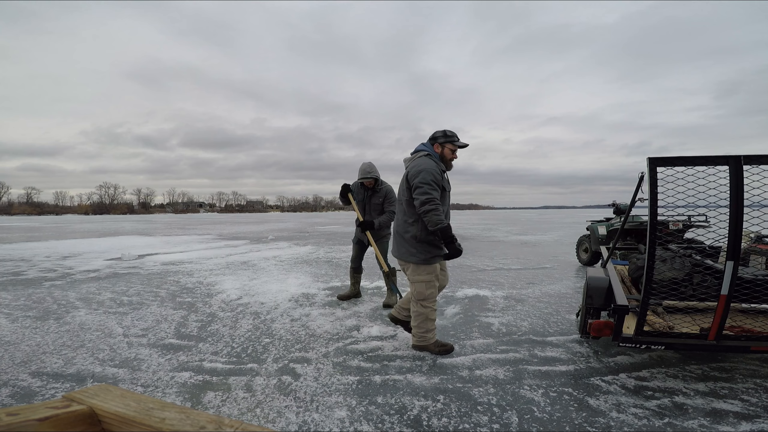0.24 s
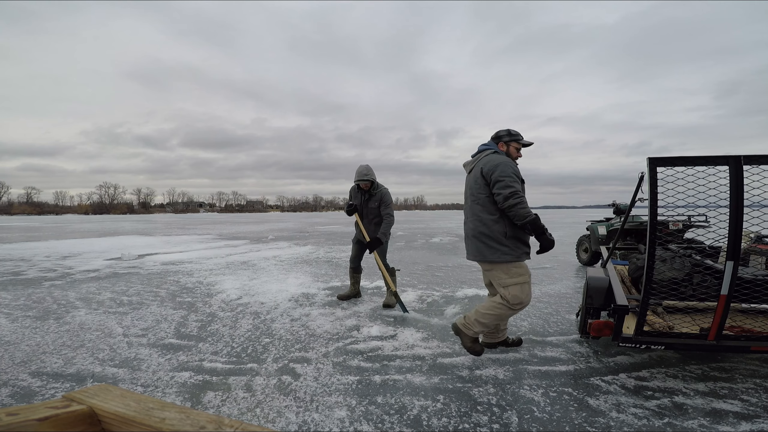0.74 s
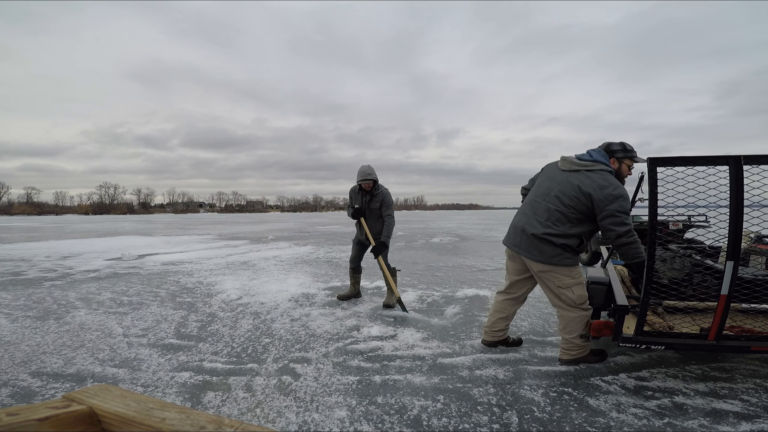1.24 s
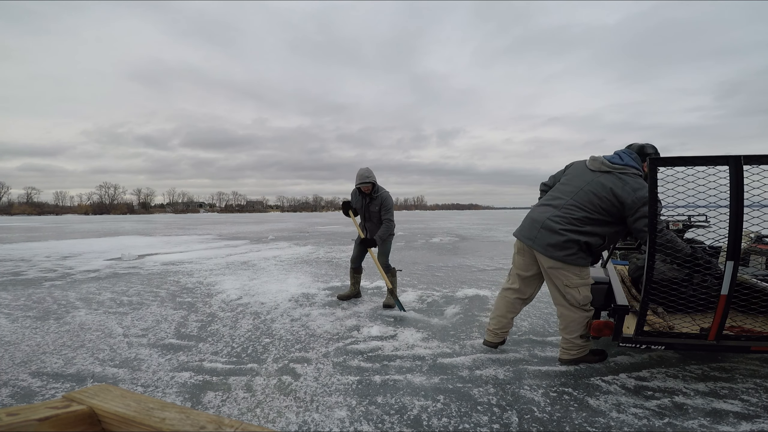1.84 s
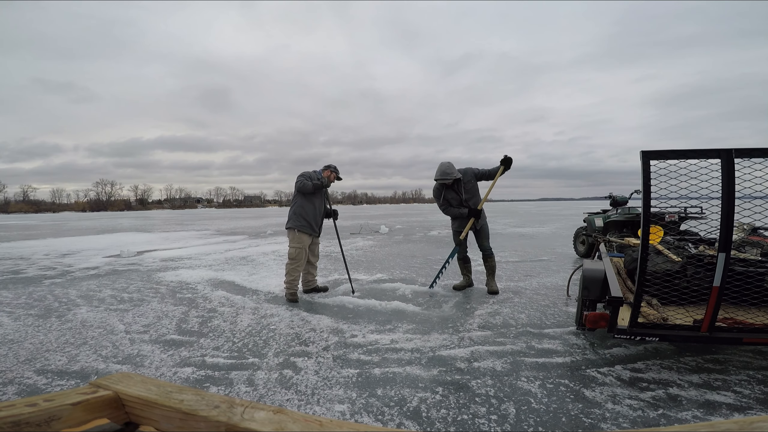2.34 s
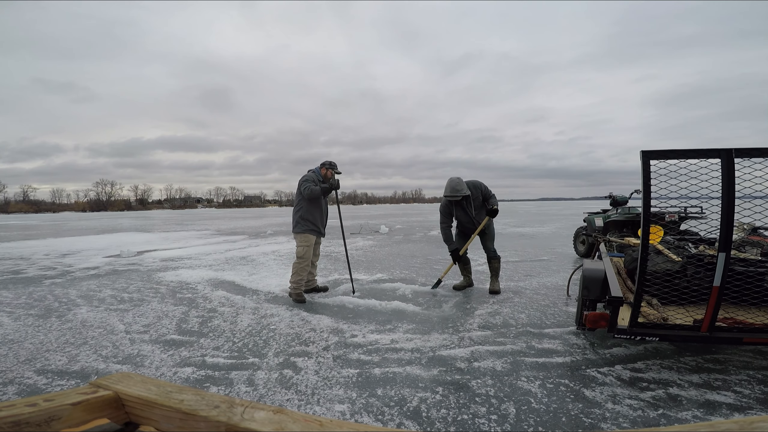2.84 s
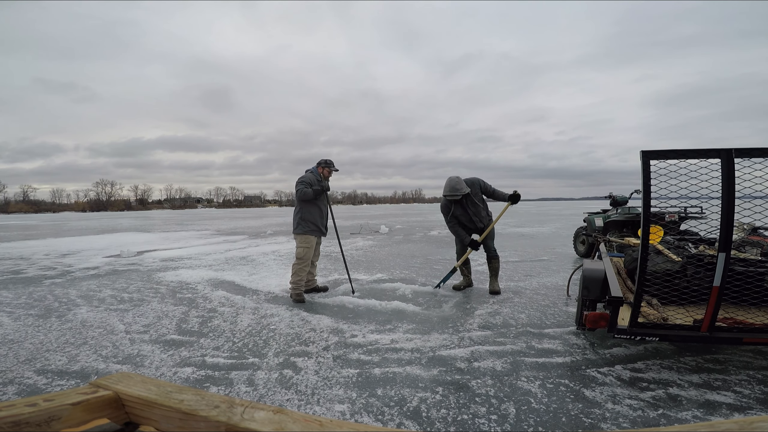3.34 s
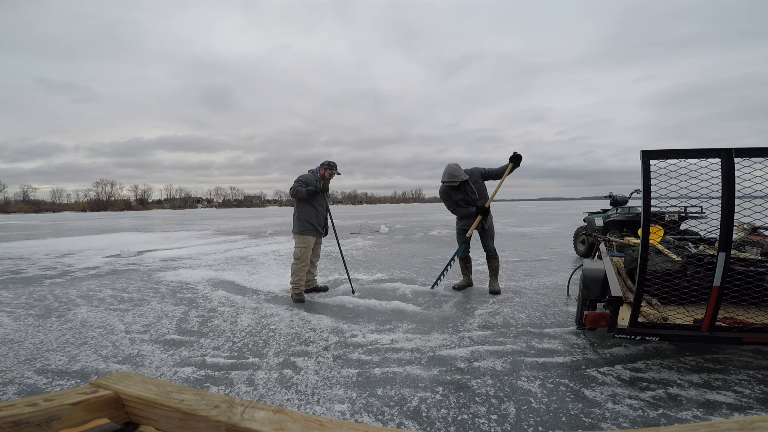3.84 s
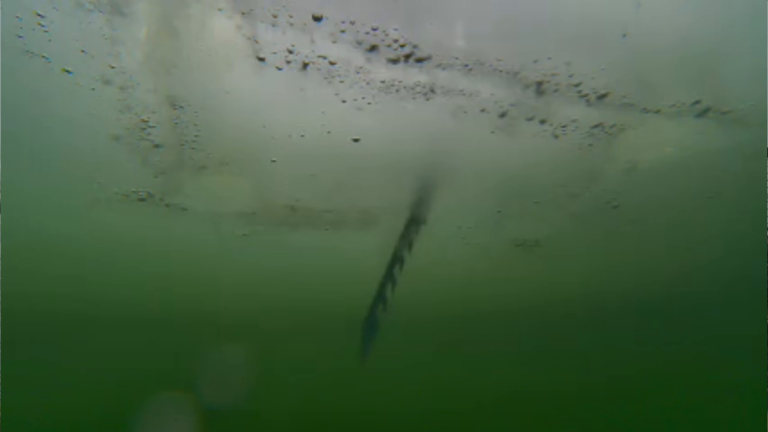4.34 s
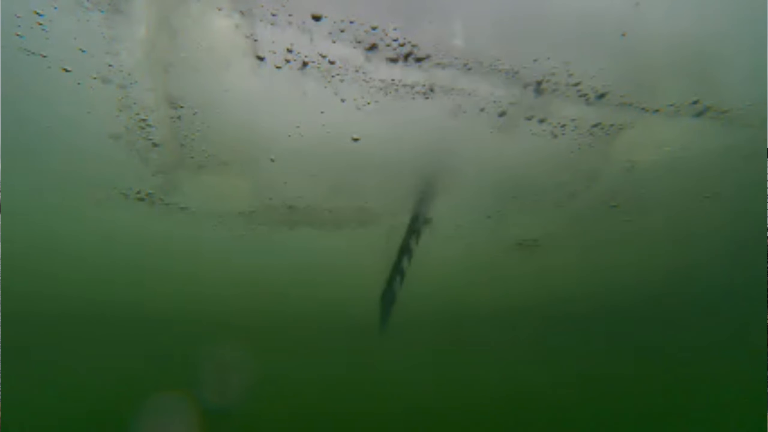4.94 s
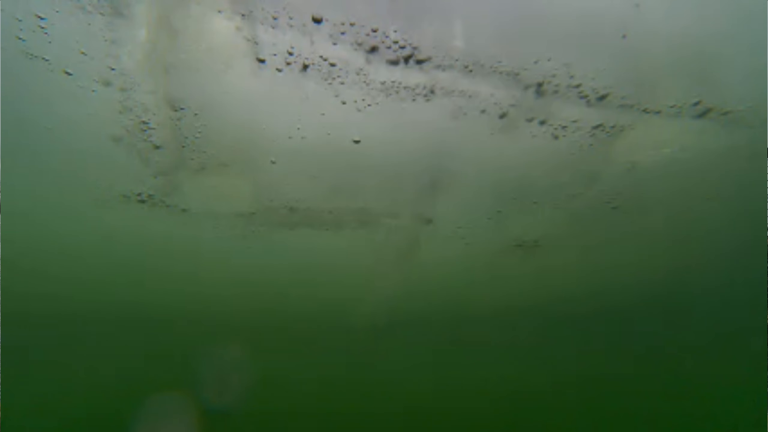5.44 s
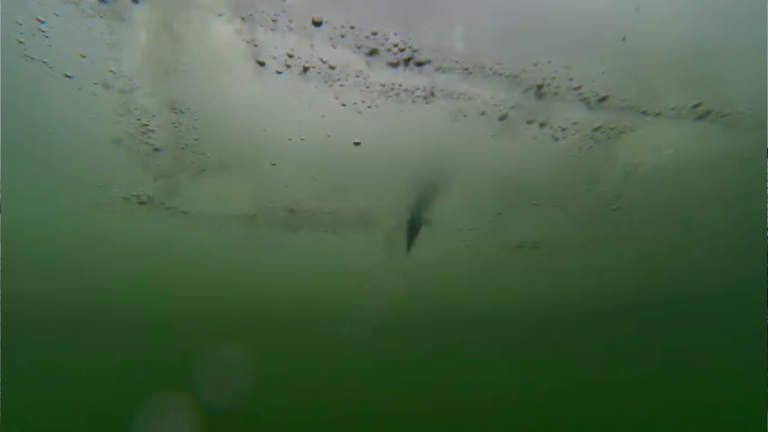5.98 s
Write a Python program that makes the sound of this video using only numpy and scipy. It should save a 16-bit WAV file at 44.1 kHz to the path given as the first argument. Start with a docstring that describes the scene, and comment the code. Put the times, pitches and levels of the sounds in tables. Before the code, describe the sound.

On an open frozen lake, a long steel hand saw cuts ice: a loud, crunchy push, then a weaker rattling pull, roughly every 0.7 seconds. Cracks and brief squeaks break through. Faint boot thuds and a hard double gear knock on a trailer come early. After about two seconds a soft pop shifts the sawing to a duller, more distant sound. Wind rumbles directly on the microphone, with no reverberation.

```python
"""A loud rasping push, then a lighter rattling pull, about every 0.7 s: a long hand saw cuts lake ice.
The first strokes sound close, the later ones farther off and duller. Cracks, squeaks, boot thuds, gear
knocks on a trailer, soft pops, wind rumble and faint hiss join in.
The rasp is noise made of tiny ice chips, sent through the echoes and resonances of the steel blade.
Cracks and thuds are dying noise, knocks add ringing sines, and the wind is slow shaped noise."""
import sys
import numpy as np
from scipy import signal
from scipy.fft import rfft, irfft
from scipy.io import wavfile

SR = 44100
rng = np.random.default_rng(int(sys.argv[2]) if len(sys.argv) > 2 else 0)


def digitize_waveform(pressure):
    """Quantize a signal to 16-bit integers and store it at the path in sys.argv[1].

    Rows of a 2-D input are taken as channels; values are limited to [-1, 1].
    """
    field = np.atleast_2d(pressure).T
    bounded = np.clip(field, -1, 1)
    quanta = np.round(bounded * 32767).astype(np.int16)
    wavfile.write(sys.argv[1], SR, quanta)


N = 273840
TIME = np.arange(N) / SR  # seconds

# The saw is pushed down. Each row: start in seconds, speeding up in seconds, slowing down in seconds,
# relative level in dB, swell from the ends in dB, deep crunch in dB, hiss of fine chips in dB.
PUSH_STROKES = [(-0.161, 0.19, 0.099, -18, 18, 5.5, -7), (0.438, 0.18, 0.088, -16.5, 12.5, 1, -2.5),
                (1.08, 0.15, 0.083, -15.5, 18, 4, -0.5), (1.655, 0.2, .11, -18, 14, 3, -3),
                (2.434, 0.22, 0.18, -21, 32, -0.5, -9.5), (3.184, .206, 0.14, -21, 21, -0.5, -10),
                (3.906, 0.21, 0.23, -22.5, 33.5, 0.5, -9), (4.28, 0.13, 0.089, -25, 19, 3, -9),
                (4.87, 0.22, 0.17, -23, 27.5, 2, -9), (5.608, 0.23, .105, -22, 17, -0.5, -9.5)]
# The saw is pulled back up. Each row has the same columns as a push.
PULL_STROKES = [(0.111, 0.21, 0.13, -30, 11.3, 1.9, -3), (0.675, 0.17, 0.34, -26.5, 20.3, 4.6, -3),
                (1.299, 0.3, 0.07, -29, 6.3, 5.7, -1), (1.935, .133, 0.34, -30, 11, 6.5, -3),
                (2.765, 0.34, 0.11, -32, 11.5, 1.8, -6), (3.514, 0.2, 0.17, -36, 3.9, 2.8, -8.5),
                (4.445, 0.32, 0.095, -32.5, 18, 5.6, -9.5), (5.198, .202, 0.19, -33.5, 10, 4.4, -8),
                (5.917, 0.39, .25, -38.5, 2, 1.3, -9)]
# The teeth dig in suddenly and work free. Each row: start in seconds, dB over the stroke, length in seconds.
TEETH_DIGS = [(0.231, 9, 0.075), (0.364, 7, 0.045), (0.523, 2, .11), (0.906, 11.5, 0.039),
              (0.994, 7.5, 0.033), (1.205, 3, 0.063), (1.374, 3, 0.074), (1.793, 0.5, 0.043),
              (3.12, 0, 0.086), (4.106, 5, 0.074), (4.61, 6, 0.051), (4.957, 5, 0.091), (5.871, 3.5, 0.073)]
# Colour of the close rasp. Each row: frequency in Hz, relative level in dB per Hz.
CLOSE_COLOUR = [(94, -14), (160, -7), (357, -6), (524, -4), (599, -6.5), (659, 1), (783, -8), (879, 2.5),
                (1150, 3.5), (2990, -2), (4920, -1), (5410, -5), (6810, -7), (8090, -11.5), (15500, -50.5)]
# Colour of the rasp farther off. Each row: frequency in Hz, relative level in dB per Hz.
FAR_COLOUR = [(120, -48), (200, -10.5), (420, -11.5), (530, -5), (660, -3.5), (800, -6), (1100, 1.5),
              (1400, -0.5), (1540, -5), (1700, -3), (2420, -0.5), (2950, -5), (4400, -3.5), (6470, -11.5),
              (15500, -43)]
# Resonances of the steel blade. Each row: frequency in Hz, width in Hz, relative level in dB.
BLADE_MODES = [(955, 60, -2), (1125, 50, 4), (1235, 60, 4), (1375, 50, 1), (1690, 60, -2), (1920, 60, -2),
               (2290, 80, 0), (2435, 40, 3), (2580, 50, 3), (2790, 70, 0), (3340, 70, 0), (4050, 220, 0),
               (6710, 25, 7), (6850, 55, 7), (7372, 35, 3), (7950, 100, 7), (9150, 300, 1), (11100, 400, 1)]
# A tooth catches hard and breaks out a chip. Each row: start in seconds, relative peak in dB,
# pitch in Hz, time to fade by 60 dB in seconds.
TOOTH_CATCHES = [(0.109, -18, 1090, 0.055), (0.173, -21.5, 1040, 0.029), (0.236, -11, 2370, .06),
                 (0.452, -13, 6850, 0.22), (0.522, -9, 1850, 0.047), (0.564, -2, 1120, .09),
                 (0.759, -18.5, 1230, .044), (0.917, -12.5, 1260, 0.056), (1.124, -7, 1760, 0.033),
                 (1.204, -7, 2700, .03), (1.79, 0, 1550, .03), (2.066, -17, 2160, .05),
                 (2.19, -16, 1200, 0.041), (2.911, -18, 2430, 0.035), (4.339, -11, 2750, 0.029),
                 (4.552, -29, 1290, .035), (4.729, -25, 2400, 0.066), (4.846, -26, 760, 0.021),
                 (5.345, -9, 1710, 0.053), (5.409, -22, 1140, .054), (5.739, -7.5, 1122, 0.056)]
# The blade binds in the slot and squeaks. Each row: middle in seconds, peak in dB, pitch in Hz,
# length in seconds.
BLADE_SQUEAKS = [(0.03, -14.5, 2780, 0.089), (1.267, -14.5, 2180, 0.032), (1.816, -11.5, 1874, .09),
                 (2.193, -21, 4470, 0.027), (3.12, -20, 2320, 0.06), (3.145, -24.5, 1380, 0.047),
                 (4.432, -29, 2420, 0.034), (5.108, -15.5, 2400, .05)]
# Gear knocks on the trailer. Each row: start in seconds, relative peak in dB.
GEAR_KNOCKS = [(1.671, 1.5), (1.685, 4.5)]
# The trailer rings. Each row: frequency in Hz, relative level in dB, time to fade by 60 dB in seconds.
TRAILER_MODES = [(185, -20, .2), (388, -15.5, .4), (445, -20, .4), (680, -21, .1), (900, -14, .06),
                 (1400, -10, .04), (1720, -12, .04), (2400, -13, .03), (3350, -12, .03)]
# Boots and shifting weight. Each row: start in seconds, peak in dB, pitch in Hz.
BOOT_THUDS = [(0.271, -31, 204), (0.831, -31.5, 192), (.92, -34.5, 170), (1.56, -23.5, 360),
              (1.685, -27, 179)]
# The sound jumps with a soft pop. Each row: start in seconds, peak in dB.
SOFT_POPS = [(2.146, -18.5), (4.3795, -9.5)]
# Strength of the wind on the microphone. Each row: time in seconds, level between 30 and 110 Hz in dB.
WIND_STRENGTH = [(0, -38.5), (1.3, -43.5), (1.7, -39), (4.1, -41.5), (4.5, -37.5), (5.1, -38),
                 (6.21, -41.5)]
# Colour of the wind rumble. Each row: frequency in Hz, relative level in dB per Hz.
WIND_COLOUR = [(1, -5.5), (4, 2.5), (10, -5), (20, -10.5), (32, -20.5), (50, -28), (80, -33), (150, -43.5),
               (300, -53), (900, -65)]
# Eddies buffet the microphone. Each row: middle in seconds, peak in dB, frequency in Hz.
WIND_BUFFETS = [(2.524, -22, 42), (3.13, -15.5, 33), (3.686, -9.5, 19.3), (5.178, -19, 38),
                (5.645, -10.5, 17.7)]
# Colour of the open air. Each row: frequency in Hz, relative level in dB per Hz.
AIR_COLOUR = [(88, 1), (150, 21), (445, 14), (1320, 6), (1540, 7), (2360, 8), (4220, -7), (9000, -7),
              (15500, -16)]

FAR_FROM_S = 2.146  # from here on the rasp has its far colour
# the blade gets going and comes to rest; roundness 1 is a pointed swell, 2 a rounded one
PUSH_ATTACK_S, PUSH_RELEASE_S, PUSH_ROUNDNESS = 0.026, 0.051, 1.324
PULL_ATTACK_S, PULL_RELEASE_S, PULL_ROUNDNESS = 0.065, 0.07, 0.91
# a blade deep in the ice crunches more and hisses less; slow teeth break coarser chips
DEPTH_CRUNCH_DB, DEPTH_HISS_DB, SLOW_CRUNCH_DB = 1.5, -3.5, 2
TURN_DB = -63  # loose crumbs keep grating in the slot while the saw turns round
DIG_ATTACK_S = 0.0073
SNAGS_PER_S, SNAG_DB, SNAG_T60_S = 7, 12, 0.029  # chance snags; their dB is relative to the pull
THUD_T60_S = 0.49
AIR_DB = -54.5
CUTOFF_HZ = 15650


def from_db(db):
    """Turn decibels into a gain."""
    return 10 ** (np.asarray(db) / 20)


def rms(x):
    """Average strength of a sound (root mean square)."""
    return np.sqrt(np.mean(x ** 2) + 1e-20)


def filtered(x, hz, kind, order=2):
    """Butterworth filter that only looks back in time."""
    sections = signal.butter(order, np.minimum(hz, .45 * SR), kind, fs=SR, output="sos")
    return signal.sosfilt(sections, x + 1e-18)


def coloured(x, spectrum):
    """Shape a sound by a table of frequencies and levels."""
    hz, db = np.transpose(spectrum)
    bins = np.fft.rfftfreq(N, 1 / SR) + 1e-3
    level_db = np.interp(np.log(bins), np.log(hz), db, left=-120, right=-120)
    return irfft(rfft(x) * from_db(level_db), N)


def band(x, low, high):
    """Keep the part between two frequencies, with soft edges."""
    bins = np.fft.rfftfreq(N, 1 / SR) + 1e-3
    below_high = 1 / (1 + (bins / high) ** 12)
    below_low = 1 / (1 + (bins / low) ** 12)
    return irfft(rfft(x) * (below_high - below_low), N)


def drift(per_s):
    """Smooth random wandering around 0 with spread 1."""
    # made at a fortieth of the sample rate; the filter's start is dropped
    smoother = signal.butter(2, min(per_s, SR / 90), fs=SR / 40, output="sos")
    slow = signal.sosfilt(smoother, rng.standard_normal(N // 40 + 502))[500:]
    return np.interp(np.arange(N) / 40, np.arange(len(slow)), slow / rms(slow))


def resonate(x, hz, width_hz):
    """One resonance, with gain 1 at its top."""
    r = np.exp(-np.pi * width_hz / SR)
    feedforward = np.array([1, 0, -1]) * (1 - r * r) / 2
    feedback = [1, -2 * r * np.cos(2 * np.pi * hz / SR), r * r]
    return signal.lfilter(feedforward, feedback, x + 1e-18)


def burst(t60):
    """Half a second of noise that fades by 60 dB in the given time."""
    age = TIME[:SR // 2]
    return rng.standard_normal(len(age)) * from_db(-60 * np.minimum(age / t60, 4))


def add(out, s, sound, peak_db):
    """Lay a sound into a track at its time and peak level."""
    start = max(round(s * SR), 0)
    scaled = from_db(peak_db) * sound / np.abs(sound).max()
    out[start:start + len(sound)] += scaled[:N - start]


def saw(push, pull, push_db, pull_db, splinter_db, judder_db):
    """On the push the teeth cut densely and damp the blade; on the pull they skip and let it ring."""
    push_gain, down, *push_bite = push
    pull_gain, up, *pull_bite = pull
    force = np.sqrt(push_gain ** 2 + pull_gain ** 2 + from_db(TURN_DB) ** 2)
    pushing = (push_gain / force) ** 2  # 1 on the push, 0 on the pull
    depth = pushing * down - (1 - pushing) * up
    crunch_db, hiss_db = pushing * np.array(push_bite) + (1 - pushing) * np.array(pull_bite)
    crunch_db = crunch_db + DEPTH_CRUNCH_DB * depth + SLOW_CRUNCH_DB * np.abs(depth)
    hiss_db = hiss_db + DEPTH_HISS_DB * pushing * down

    cut = chips(per_s=5000, size_db=1.0, clump_db=1.5, clumps_per_s=36, powder=0.62)
    # now and then a larger splinter snaps off
    splinters = chips(per_s=220, size_db=2.5, clump_db=0.0, clumps_per_s=17, powder=0.13)
    cut = cut + from_db(splinter_db) * resonate(splinters, hz=2370, width_hz=2500)
    cut = shortening(cut, (depth + 1) / 2, long_s=.0015, short_s=.0008, echo=.33)
    cut = blade(cut, ring_db=-11)

    skip = chips(per_s=2400, size_db=2.5, clump_db=2.5, clumps_per_s=56, powder=1.0)
    skip = blade(skip, ring_db=-10.5)
    # the unloaded blade judders against the sides of the slot
    skip = skip * from_db(judder_db * drift(per_s=17.8))

    push_scrape = np.sqrt(pushing) * from_db(push_db) * cut / rms(cut)
    pull_scrape = np.sqrt(1 - pushing) * from_db(pull_db) * skip / rms(skip)
    # the light pull is patchier than the steady push
    scrape = lumpy(push_scrape + pull_scrape, patchy_db=3.6 - 1.0 * pushing, bites_per_s=30, count=44)
    close = voiced(scrape, CLOSE_COLOUR, crunch_db, hiss_db)
    far = voiced(scrape, FAR_COLOUR, crunch_db, hiss_db)
    return force * from_db(digging()) * np.where(TIME < FAR_FROM_S, close, far)


def strokes(rows, attack_s, release_s, roundness):
    """Each stroke swells and slows again: gives its gain, travel (-1 to 1), crunch dB and hiss dB."""
    gain, weight, state = np.zeros(N), np.full(N, 1e-9), np.zeros((3, N))
    for start, rise_s, fall_s, db, swell_db, crunch_db, hiss_db in rows:
        fastest = start + rise_s
        end = fastest + fall_s
        now = (TIME >= start) & (TIME < end)
        t = TIME[now]
        travel = np.interp(t, [start, fastest, end], [-1, 0, 1])
        moving = np.minimum((t - start) / attack_s, 1) * np.minimum((end - t) / release_s, 1)
        swell = from_db(db - swell_db * np.abs(travel) ** roundness)
        gain[now] = np.hypot(gain[now], moving * swell)
        # strokes that overlap share their travel and colour
        weight[now] += moving
        state[:, now] += [moving * travel, moving * crunch_db, moving * hiss_db]
    return gain, *(state / weight)


def digging():
    """Extra force in dB: each dig grips at once and eases off over its length."""
    extra_db = np.zeros(N)
    for s, db, length in TEETH_DIGS:
        grip = np.clip((TIME - s) / DIG_ATTACK_S, 0, 1)
        extra_db += db * grip * np.clip(1 - ((TIME - s) / length) ** 2, 0, 1)
    return extra_db


def chips(per_s, size_db, clump_db, clumps_per_s, powder):
    """Tiny fractures of uneven size over a powdery hiss, in clumps as the teeth grip and slip."""
    sizes = from_db(size_db * np.minimum(rng.exponential(1, N), 4)) * rng.choice([-1, 1], N)
    grains = sizes * (rng.random(N) < per_s / SR)
    mix = grains / rms(grains) + powder * rng.standard_normal(N)
    return mix * from_db(clump_db * drift(clumps_per_s))


def shortening(x, depth, long_s, short_s, echo):
    """Waves bounce along the free steel; it shortens as the saw sinks, so its overtones glide up."""
    lag = SR * (long_s + (short_s - long_s) * depth ** 2)
    n = np.arange(N)
    return x + sum(echo ** k * np.interp(n - k * lag, n, x) for k in (1, 2, 3))


def blade(x, ring_db):
    """The scraping plus the ringing steel, whose modes come and go as the contact moves along it."""
    ring = np.zeros(N)
    for hz, width, db in BLADE_MODES:
        ring += from_db(db + 3.5 * drift(per_s=12.0)) * resonate(x, hz, width)
    return x + from_db(ring_db) * ring


def lumpy(x, patchy_db, bites_per_s, count):
    """Every bite breaks chips of another size, so each narrow band swells and fades by itself."""
    # neighbouring bands overlap as triangles and are narrower at low pitch
    place = np.sqrt(np.fft.rfftfreq(N, 1 / SR) / CUTOFF_HZ) * count
    whole, out = rfft(x), np.zeros(N)
    for k in range(count + 1):
        part = irfft(whole * np.maximum(1 - np.abs(place - k), 0), N)
        out += part * from_db(patchy_db * drift(bites_per_s))
    return out


def voiced(scrape, colour, crunch_db, hiss_db):
    """Deep bites crunch, shallow quick ones hiss; the bands share the force of the stroke."""
    x = coloured(scrape, colour)
    crunch, rasp, hiss = band(x, 50, 2800), band(x, 2800, 6000), band(x, 6000, SR)
    deep, fine = from_db(crunch_db), from_db(hiss_db)
    mix = deep * crunch / rms(crunch) + rasp / rms(rasp) + fine * hiss / rms(hiss)
    return mix / np.sqrt(deep ** 2 + 1 + fine ** 2)


def catches(pull_gain, level_db, width_share, top_hz):
    """A snagged tooth lets go with a short crack that jolts the blade."""
    # besides the listed catches, chance snags follow the strength of the pull
    chance = rng.random((N // 400, 2))
    moments = np.linspace(0, TIME[-1], len(chance), endpoint=False)
    snags = []
    for s, (luck, pitch) in zip(moments, chance):
        if luck < SNAGS_PER_S * TIME[-1] / len(chance):
            pull_db = 20 * np.log10(np.interp(s, TIME, pull_gain) + 1e-6)
            snags.append((s, SNAG_DB + pull_db, 1000 + 1700 * pitch, SNAG_T60_S))
    out = np.zeros(N)
    for s, db, hz, t60 in [*TOOTH_CATCHES, *snags]:
        crack = filtered(resonate(burst(t60), hz, width_share * hz), 380, "high")
        add(out, s, filtered(crack, top_hz, "low", order=6), db + level_db)
    return blade(out, ring_db=-5.0)


def squeaks(width_share):
    """Irregular stick and slip drives one narrow resonance for a moment."""
    out = np.zeros(N)
    for s, db, hz, length in BLADE_SQUEAKS:
        slips = rng.standard_normal(SR // 4)
        tone = resonate(resonate(slips, hz, width_share * hz), hz, width_share * hz)
        tone = tone[-int(length * SR):]  # the end, where the resonance is fully going
        add(out, s - length / 2, tone * np.hanning(len(tone)), db)
    return out


def trailer(crack_db, ring_db):
    """Hard knocks, each a crack of noise and the dying ring of the frame."""
    cracks, blows = np.zeros(N), np.zeros(N)
    for s, db in GEAR_KNOCKS:
        crack = filtered(burst(t60=0.058), [350, 5500], "band", order=1)
        add(cracks, s, filtered(crack, 7000, "low", order=4), db + crack_db)
        add(blows, s, np.ones(1), db + ring_db)
    age = TIME[:SR // 2]
    ring = sum(from_db(db - 60 * age / t60) * np.sin(2 * np.pi * hz * age) for hz, db, t60 in TRAILER_MODES)
    return cracks + signal.fftconvolve(blows, ring)[:N]


def thuds(width_share):
    """Soft heavy contacts give a short dull boom."""
    out = np.zeros(N)
    for s, db, hz in BOOT_THUDS:
        boom = resonate(burst(THUD_T60_S), hz, width_share * hz)
        add(out, s, filtered(boom, 1450, "low"), db)
    return out


def pops(fade_s):
    """The sound jumps with a soft pop that dies away."""
    out = np.zeros(N)
    for s, db in SOFT_POPS:
        add(out, s, np.exp(-TIME[:SR // 2] / fade_s), db)
    return out


def wind(swell_cycles):
    """Slow eddies at the microphone, with a few single buffets of pressure."""
    gust_s, gust_db = np.transpose(WIND_STRENGTH)
    eddies = coloured(rng.standard_normal(N), WIND_COLOUR)
    out = from_db(np.interp(TIME, gust_s, gust_db)) * eddies / rms(band(eddies, 30, 110))
    for s, db, hz in WIND_BUFFETS:
        cycles = (TIME - s) * hz
        swell = np.exp(-np.minimum((cycles / swell_cycles) ** 2, 50))
        out += from_db(db) * np.cos(2 * np.pi * cycles) * swell
    return out


def open_air():
    """The faint even hiss of the open lake: steady shaped noise."""
    air = coloured(rng.standard_normal(N), AIR_COLOUR)
    return from_db(AIR_DB) * air / rms(air)


def scene():
    """Everything reaches one microphone directly: the flat ice gives no reverberation."""
    push = strokes(PUSH_STROKES, PUSH_ATTACK_S, PUSH_RELEASE_S, PUSH_ROUNDNESS)
    pull = strokes(PULL_STROKES, PULL_ATTACK_S, PULL_RELEASE_S, PULL_ROUNDNESS)
    sawing = saw(push, pull, push_db=1.0, pull_db=1.85, splinter_db=-3.5, judder_db=1.28)
    cracking = catches(pull[0], level_db=-6.5, width_share=0.56, top_hz=8360)
    squeaking = squeaks(width_share=.12)
    knocks_and_boots = trailer(crack_db=-10.5, ring_db=-11) + thuds(width_share=0.69)
    background = pops(fade_s=0.11) + wind(swell_cycles=0.59) + open_air()
    return (sawing + cracking + squeaking + knocks_and_boots + background)[None]


def record(dry):
    """A steep low-pass filter removes the very top of the treble."""
    return signal.sosfilt(signal.ellip(12, .1, 90, CUTOFF_HZ, fs=SR, output="sos"), dry)


dry = scene()
out = record(dry)
digitize_waveform(out)
```